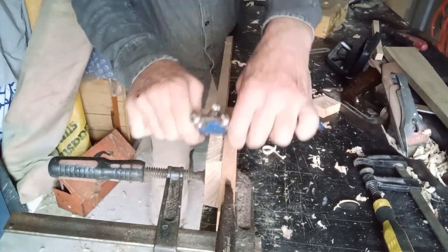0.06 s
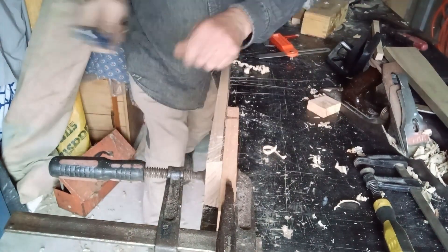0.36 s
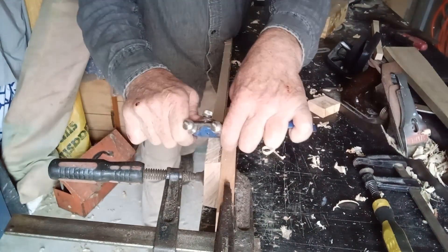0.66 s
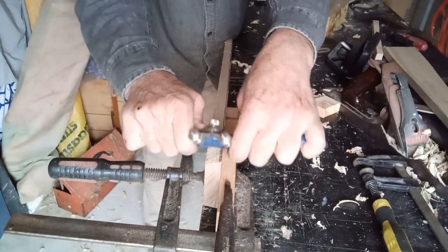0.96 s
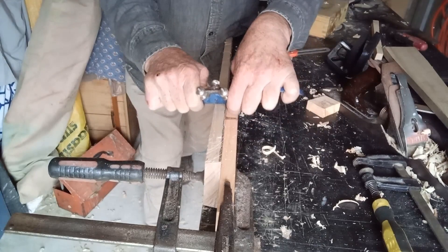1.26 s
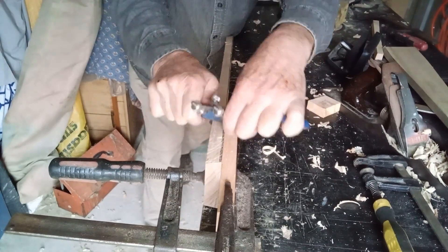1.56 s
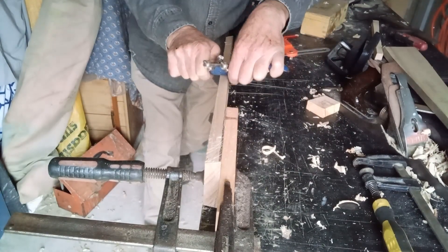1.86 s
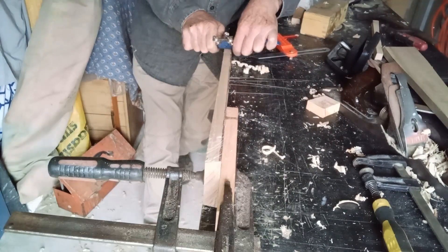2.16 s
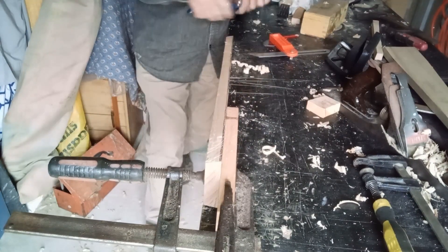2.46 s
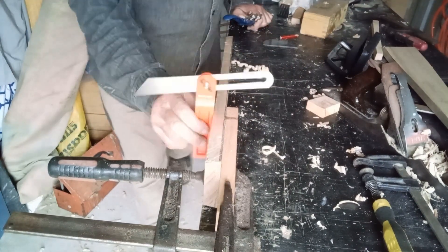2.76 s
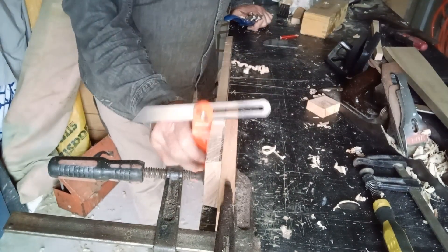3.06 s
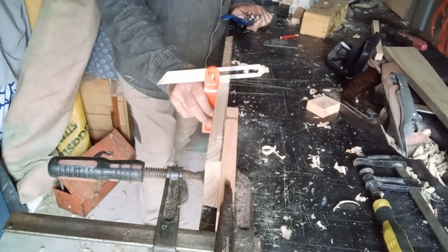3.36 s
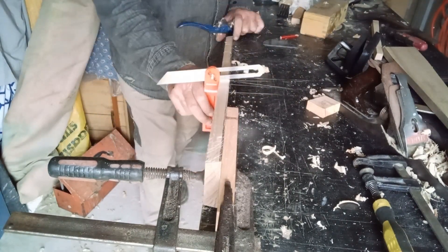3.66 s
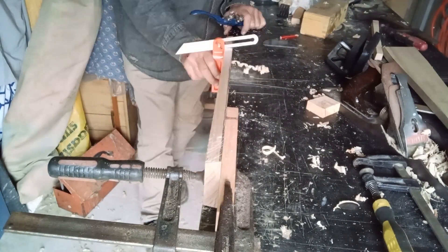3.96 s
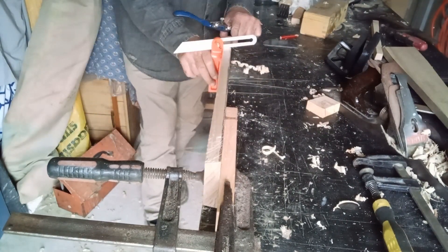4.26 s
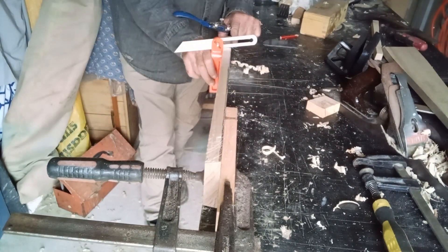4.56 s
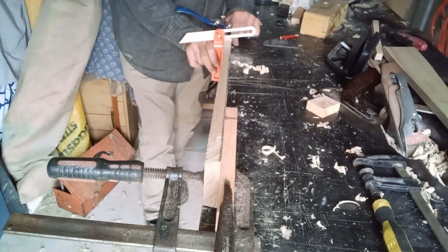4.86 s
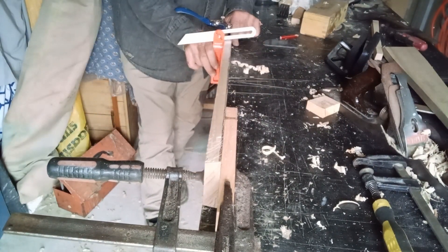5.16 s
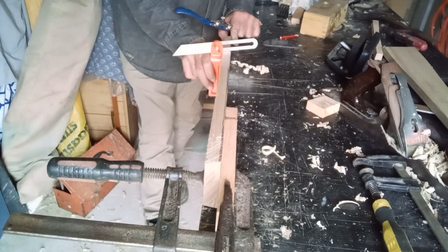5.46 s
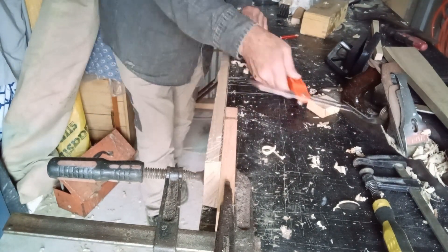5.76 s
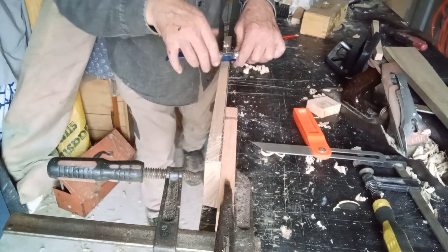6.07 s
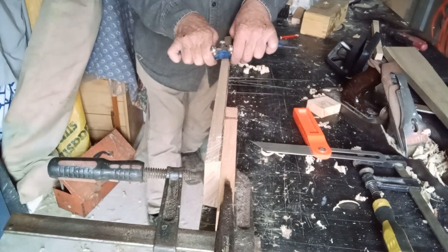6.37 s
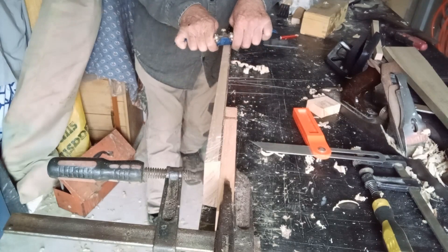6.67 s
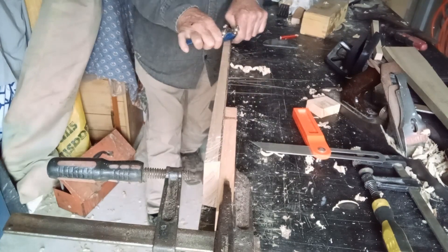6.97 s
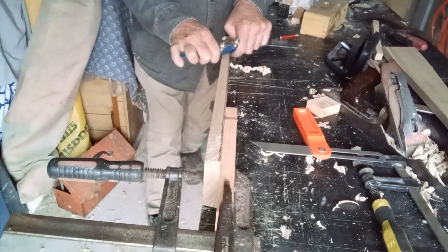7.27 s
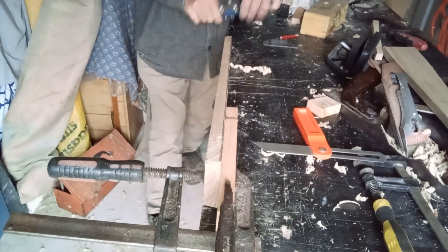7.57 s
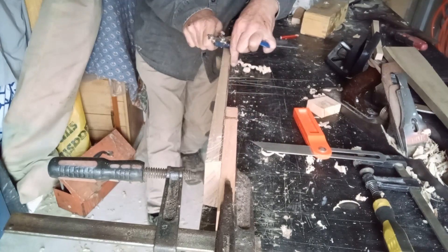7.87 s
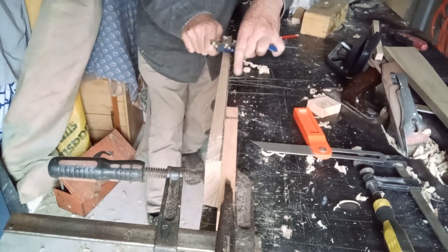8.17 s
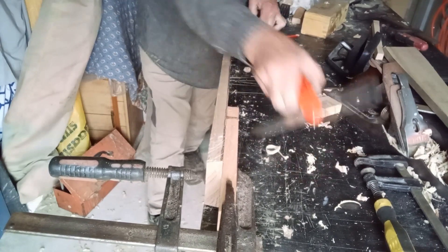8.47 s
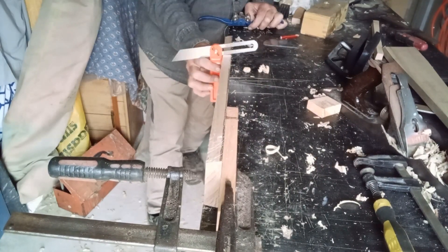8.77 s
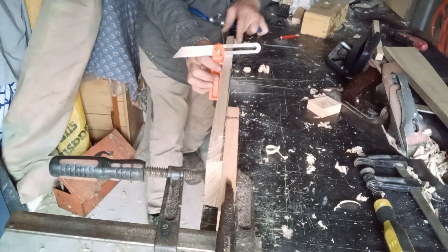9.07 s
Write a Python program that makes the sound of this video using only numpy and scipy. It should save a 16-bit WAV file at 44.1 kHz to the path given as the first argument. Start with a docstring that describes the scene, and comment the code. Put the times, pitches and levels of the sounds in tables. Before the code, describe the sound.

In a small workshop, sleeves brush and a tool knocks on wood. A spokeshave cuts along a wooden rail in quick, crunchy strokes that catch and chatter. The cutting stops while an angle gauge taps, slides and squeaks on the wood, then drops onto the bench with a brief rattle. A second bout of scraping follows, ending in a few knocks. The sound is close, over a faint hum.

```python
"""Sleeves brush softly and a tool knocks on wood, over the air and faint hum of a small workshop.
Then a spokeshave (a two-handled blade) cuts a bevel along a clamped wooden rail in two bouts: fibres
snap in a crunch, the edge catches and chatters in the grain, and rail and tool ring along.
Between the bouts a bevel gauge (a tool for checking angles) taps, slides and squeaks on the rail,
then is dropped on the bench and rattles to rest. A few last knocks and brushes end the work."""
import sys
import numpy as np
from scipy import signal
from scipy.fft import rfft, irfft, next_fast_len
from scipy.io import wavfile
from scipy.ndimage import uniform_filter1d

SR = 44100
rng = np.random.default_rng(int(sys.argv[2]) if len(sys.argv) > 2 else 0)


def to_wav(sig):
    """Store sig (one row per channel, or 1-D mono) as 16-bit WAV at the path in sys.argv[1].

    Samples outside -1..1 are clipped; the rate is SR.
    """
    pcm = np.clip(np.atleast_2d(sig), -1, 1) * 32767
    pcm = np.round(pcm).astype(np.int16)
    wavfile.write(sys.argv[1], SR, pcm.T)  # frames by channels


N = 411453
TAPS = 8192  # samples in a filter or a single hit
HZ = np.fft.rfftfreq(TAPS, 1 / SR)
# where the bass, middle, bite and hiss ranges each start and end: (frequency [Hz])
BAND_EDGES = [0, 480, 700, 1500, 1950, 3500, 5000, SR]
# the four ranges fade into each other and always add up to one
BANDS = np.array([np.interp(HZ, BAND_EDGES, np.repeat(row, 2)) for row in np.eye(4)])

# Levels in the tables are relative: each source's function may shift them.
# tone of the room's air: (frequency [Hz], level [dB])
AIR_TONE = [(18, -73.5), (30, -44.5), (75, -35.5), (161, -17.5), (184, -12.5), (233, -14), (280, -14),
            (319, -12.5), (355, -17.5), (426, -17), (473, -20), (9220, -39), (10200, -42),
            (16000, -42.5)]
# how much the air differs between the ears: (frequency [Hz], width [ratio])
AIR_WIDTH = [(60, .5), (140, .1), (300, 0.23), (1400, 0.59), (3000, 0.93)]
# the hum's two tones: (pitch [Hz], level [dB])
HUM_TONES = [(193, -9.5), (319, -3)]
# the hum swells and fades: (time [s], level [dB])
HUM_LEVEL = [(0, -97), (2.3, -64), (2.7, -61.5), (4.9, -62), (5.5, -66.5), (6.4, -66), (8.5, -70),
             (9.3, -72.5)]
# how long the room rings: (frequency [Hz], time to fade by 60 dB [s])
ROOM_DECAY = [(200, 0.11), (1000, 0.27), (4000, .22), (15000, 0.12)]
# how alike left and right are: (frequency [Hz], likeness [0 to 1])
LIKENESS = [(40, .8), (130, 0.99), (600, 1), (1400, 0.95), (3000, 0.66), (7000, .55), (15000, .4)]
# which side is louder: (frequency [Hz], left minus right [dB])
BALANCE = [(200, -0.4), (1000, 0), (2500, -2), (8000, -1.5), (14000, -1)]
# sleeves brush the tools: (middle time [s], length [s], level [dB], crackle over swish [dB],
# rate of the cloth's ribs [Hz])
BRUSHES = [(0.034, 0.073, -64, 1, 2130), (0.099, 0.037, -63.5, 1, 2150), (0.224, 0.19, -72.5, -3, 2240),
           (0.294, 0.042, -68.5, 5, 2370), (0.443, 0.12, -75.5, 5.5, 2300), (0.679, 0.14, -62.5, -7, 2500),
           (6.263, 0.28, -64.5, -12, 2450), (8.856, 0.09, -64.5, -17, 2280), (8.99, 0.07, -61.5, -23, 2520),
           (9.207, 0.21, -63, -12, 2400)]
# tone of rubbing cloth: (frequency [Hz], level [dB])
SWISH_TONE = [(150, -9), (1000, 2.5), (3500, -12.5), (7300, -4.5), (9000, -24), (16000, -26.5)]
# the gauge's steel blade slides on wood: (middle time [s], length [s], level [dB])
SLIDES = [(2.681, 0.036, -46), (3.012, 0.026, -53), (3.2, 0.05, -53), (3.212, .005, -44),
          (3.344, 0.062, -52), (3.354, .005, -40), (3.768, 0.035, -68), (3.975, 0.05, -65),
          (4.317, .05, -61), (6.004, 0.033, -52), (6.119, .008, -23.5)]
# the gauge drags and squeaks: (time [s], length [s], level [dB], start pitch [Hz], end pitch [Hz])
SQUEAKS = [(2.88, 0.035, -51, 1116, 747), (2.998, 0.022, -39, 1696, 1560),
           (3.171, 0.055, -38.5, 1291, 1153), (3.205, 0.056, -50.5, 760, 717),
           (3.318, .046, -36, 1195, 954), (3.345, 0.041, -41.5, 796, 702), (3.95, 0.033, -38, 1165, 1070),
           (3.99, 0.052, -45, 1690, 1760), (4.205, 0.024, -56.5, 1354, 960), (4.368, 0.039, -57, 1195, 940),
           (4.901, 0.027, -32.5, 1760, 1730), (5.168, .04, -59, 639, 730), (5.212, 0.049, -63.5, 760, 674),
           (5.31, .037, -59, 778, 790), (5.41, 0.055, -72, 15400, 15400), (5.555, 0.032, -66, 10850, 10200),
           (5.685, 0.043, -59.5, 643, 805), (5.725, 0.045, -63, 740, 670), (6.14, 0.044, -51, 800, 590),
           (6.195, 0.097, -61, 732, 698)]
# the gauge taps and scuffs: (time [s], level [dB], swell [s], brightness [dB], ring [Hz])
GAUGE_TAPS = [(2.625, -62, 0.00061, 7.5, 3140), (2.865, -59.5, 0.0091, 9.5, 2700),
              (2.882, -36, 0.00073, -17, 700), (2.902, -44.5, 0.0014, -12, 1560),
              (3.002, -45, 0.0021, 10.5, 1630), (3.178, -42.5, 0.0026, -4, 1300),
              (3.192, -38, 0.0035, -2.5, 1120), (3.2105, -45, 0.00037, 1.5, 2150),
              (3.232, -50.5, 0.0018, -12, 1100), (3.345, -32.5, 0.0077, 6, 1080),
              (3.382, -30, 0.00092, -11, 740), (3.406, -46.5, 0.0023, -11, 1100),
              (3.423, -65, 0.0013, -13, 1100), (3.712, -63.5, 0.014, 14, 2890),
              (3.832, -48, 0.000079, 5.5, 5160), (3.963, -41, 0.012, 2.5, 1110),
              (3.992, -34, 0.0063, -2, 1830), (4.038, -46, 0.0014, 5, 1830),
              (4.198, -53.5, 0.00098, 7.5, 2300), (4.215, -56, 0.0023, -15, 2190),
              (4.325, -63.5, .011, 16.5, 2790), (4.369, -47, 0.00025, 5, 1240),
              (4.647, -57.5, 0.00043, 1.5, 2370), (4.683, -62.5, 0.0037, -5, 2050),
              (4.8925, -36, 0.0019, 1.5, 5200), (4.9055, -34, 0.00059, 2, 1760),
              (4.936, -54, 0.0017, -3, 1760), (5.305, -54, 0.0072, 11.5, 785),
              (5.381, -43, 0.00052, -13.5, 760), (5.813, -67, 0.0036, 21, 2800),
              (5.826, -43, 0.00049, -2, 3170), (5.8835, -46, 0.00053, 7.5, 2440),
              (5.891, -43, 0.00054, 12, 2800), (5.963, -66, 0.00034, 8.5, 3900),
              (6.003, -78, 0.006, 29.5, 3030), (6.065, -39.5, 0.00045, 8.5, 3490),
              (6.086, -41.5, 0.0044, 6, 3170), (6.1, -33, 0.001, 6.5, 1560), (6.111, -40.5, .001, 10, 2700),
              (6.1152, -33.5, 0.0002, 9.5, 7800), (6.127, -35.5, 0.0011, 5, 2300),
              (6.143, -40.5, 0.00097, -3, 1240), (6.188, -54.5, .001, -10, 2200),
              (6.215, -69, 0.0024, 0, 2200), (6.24, -62.5, 0.0036, 5, 3200), (8.543, -47, 0.0059, -8, 1104),
              (8.558, -42, 0.00071, 4.5, 1586), (8.95, -54.5, 0.00039, 8.5, 3240),
              (9.145, -62.5, 0.0028, 9, 3570)]
# the gauge rattles on the bench: (time [s], first bounce level [dB], brightness [dB], ring [Hz])
RATTLES = [(5.92, -52.5, 2, 2160), (6.159, -51, -1.5, 1490)]
# overall tone of a gauge tap: (frequency [Hz], level [dB])
GAUGE_TONE = [(40, -61.5), (100, -41.5), (150, -68), (200, -46), (400, -15), (600, -16.5), (1100, 1.5),
              (2200, -4.5), (3200, -5), (5000, -8.5), (7500, -16.5), (11000, -22.5), (15500, -31.5)]
# where the gauge's plastic and steel ring: (frequency [Hz], width [Hz], boost [dB])
GAUGE_RINGS = [(760, 140, 12.5), (877, 28, -17.5), (1040, 94, 5), (1240, 99, 7), (1370, 120, 0),
               (1560, 51, 3), (2300, 160, 7), (2820, 200, 4.5), (3170, 160, 4.5), (4440, 110, 3),
               (6970, 300, 5), (10600, 400, 4)]
# where the clamped rail rings or sounds hollow: (frequency [Hz], width [Hz], boost [dB])
RAIL_RINGS = [(222, 22, 13), (379.8, 10, 3.5), (470, 110, 8), (622, 84, -14), (760, 133, 12.5),
              (885, 47, -16), (1080, 110, 0.5), (1240, 51, 5.5), (1400, 76, -10), (1430, 35, 3.5),
              (1760, 340, -1), (2180, 130, 5.5), (2740, 120, -7), (2780, 190, 7), (3202, 46, 6.5),
              (3800, 340, -1), (3980, 64, 6), (4330, 96, 2), (5700, 1200, -1.5), (7000, 450, 3),
              (10200, 1600, 4.5)]
# where the spokeshave's iron body rings: (frequency [Hz], width [Hz], boost [dB])
IRON_RINGS = [(1490, 150, 3), (1760, 140, -4.5), (2650, 230, 2.5), (4560, 120, 2), (12500, 76, 7)]
# the spokeshave knocks on wood: (time [s], level [dB], thud [dB], brightness [dB], ring [Hz])
KNOCKS = [(0.331, -52.5, -5, -17, 1120), (0.606, -31, -9, -1.5, 3090), (0.696, -59, 12.5, -11, 470),
          (2.537, -52.5, 9, 2.5, 1320), (2.664, -33, -7.5, 7.5, 2480), (7.3121, -25, -4, 7, 4500),
          (7.3406, -29, 0, 8.5, 1090), (7.747, -33, 1.5, -7.5, 794), (7.779, -55.5, -6, 9, 1210),
          (8.273, -28.5, 3, 2.5, 1320), (8.695, -31.5, -1, -11, 1400), (8.739, -36.5, -12.5, -7, 810),
          (8.769, -46, -11, 2.5, 1430), (8.834, -51.5, -7, -25, 805)]
# overall tone of a knock: (frequency [Hz], level [dB])
KNOCK_TONE = [(40, -40.5), (100, -35.5), (150, -32.5), (200, -29.5), (400, -5), (600, -11.5), (1100, -0.5),
              (2200, -9), (3200, -8), (5000, -15.5), (7500, -25.5), (11000, -37.5), (15500, -47)]
# the blade catches in the grain: (time [s], level [dB], swell [s], fade [s], thud [dB],
# brightness [dB], ring [Hz])
CATCHES = [(0.784, -45, 0.0029, 0.011, 4, -14, 466), (0.83, -37.5, 0.007, 0.013, 6, -8.5, 760),
           (0.865, -42.5, 0.0045, 0.0043, 4.5, -10, 474), (0.903, -42, 0.0024, 0.0061, -5, -13, 513),
           (0.969, -44.5, 0.0032, 0.008, 1, 4, 1830), (1.066, -48.5, 0.0056, .006, -10, 4, 3400),
           (1.114, -38.5, 0.00061, 0.0076, 7.5, 9.5, 818), (1.167, -42, 0.0035, 0.042, 5.5, -2, 1100),
           (1.465, -32, 0.0036, 0.0057, 2.5, 12.5, 414), (1.489, -32.5, 0.0051, 0.014, 6, 10, 238),
           (1.565, -42, 0.0013, .006, -9, -13, 1110), (1.578, -35, 0.0026, 0.012, -11.5, -6.5, 1080),
           (1.765, -56, 0.0026, 0.016, 9, 17.5, 2300), (2.102, -54.5, 0.0023, 0.01, -5, 14, 2900),
           (2.153, -36.5, 0.0023, 0.027, 10.5, -6, 229), (2.355, -41, 0.0065, 0.0079, -13, -4, 810),
           (2.47, -48, .011, 0.0052, 14, 18.5, 399), (6.77, -41.5, 0.0042, 0.0049, -5.5, 4.5, 2280),
           (6.818, -23.5, .004, 0.0061, 6, 6, 367), (6.828, -23.5, 0.0033, .0074, -10, 8, 380),
           (6.926, -31, 0.0058, 0.011, -13.5, 4, 1000), (6.947, -39.5, .003, .006, -8.5, 5.5, 1320),
           (7.108, -43.5, 0.0046, 0.012, 4.5, 0.5, 2170), (7.218, -26, 0.002, 0.0067, 5.5, 9, 1428),
           (7.604, -21, 0.0064, 0.0066, 7, 8, 1333), (8.18, -32.5, 0.0023, 0.0055, 8.5, 9.5, 1400),
           (8.199, -35, 0.0007, 0.005, 4.5, 8, 1610), (8.33, -56.5, 0.0047, .008, 3, 20.5, 2200)]
# overall tone of a catch: (frequency [Hz], level [dB])
CATCH_TONE = [(40, -33.5), (100, -39), (150, -22.5), (200, -17), (340, -3.5), (500, -7), (700, -4),
              (1100, -1.5), (1550, -2), (2200, -6), (3200, -10), (5000, -18.5), (7500, -27), (11000, -36),
              (15500, -39)]
# the edge makes blade or rail sing: (time [s], length [s], level [dB], start pitch [Hz], end pitch [Hz])
CHATTERS = [(.902, 0.033, -36.5, 503, 470), (.925, 0.017, -40, 1790, 1900), (.958, .019, -35, 1885, 1860),
            (.97, 0.02, -44, 440, 514), (1.016, 0.028, -43.5, 1237, 1260), (1.152, 0.035, -44.5, 470, 454),
            (1.435, 0.052, -32.5, 434, 400), (1.805, 0.047, -47, 340, 427), (1.88, 0.026, -47, 1240, 1300),
            (1.94, 0.032, -44, 1200, 1320), (1.945, 0.052, -46.5, 2960, 2800),
            (2.065, 0.031, -46.5, 1240, 1370), (2.14, 0.12, -45, 235.3, 228), (2.255, 0.032, -49, 384, 229),
            (2.265, 0.13, -47, 2380, 2166), (2.345, 0.076, -49.5, 232, 221), (2.46, 0.041, -45.5, 505, 985),
            (6.565, 0.084, -49.5, 270, 214), (6.665, 0.034, -39.5, 2360, 2220),
            (6.808, 0.05, -25.5, 377, 370), (7.025, 0.054, -47.5, 2250, 2300),
            (7.045, 0.062, -50, 239, 225), (7.43, 0.039, -44, 2300, 2110), (7.46, 0.063, -42.5, 2230, 2190),
            (7.46, 0.076, -43, 330, 307), (7.54, 0.03, -41.5, 470, 398), (7.588, 0.041, -34, 394, 372),
            (7.905, .07, -66, 15000, 15100), (7.925, 0.056, -49, 407, 335), (8.018, 0.058, -46, 339, 478),
            (8.08, 0.05, -50, 2235, 2150), (8.1, 0.038, -47, 420, 442)]
# cutting strokes; the tool's ring changes with the grip, the rail's boom with distance from the clamp:
# (start [s], end [s], force [dB], rise in force [dB], bass from depth of cut [dB], edge bite [dB],
# shaving hiss [dB], ring [Hz], ring strength [ratio], boom [Hz], boom strength [ratio])
STROKES = [(0.898, 0.992, -40.5, 2.5, -10, -1.5, -5.5, 1860, 1, 477, 2.5),
           (1.035, 1.095, -49, 1, -9, 1.5, 2, 1814, .7, 482, 1.1),
           (1.213, 1.264, -43, 3.5, -10.5, 2, -4, 1857, 1.2, 472, 2.3),
           (1.286, 1.433, -39, -1, -12, 4, -2.5, 1930, 1.4, 465, 2.3),
           (1.453, 1.51, -34.5, 2, -5, 4, -3.5, 1970, 1.2, 412, 1.1),
           (1.591, 1.64, -56, 4, -15, -3.5, 1.5, 1905, .5, 419, 1.4),
           (1.684, 1.921, -51, 4.5, -2, 5, 3.5, 2880, .9, 394, 0.96),
           (1.939, 2.193, -45, 5, -8.5, 1, 1, 2860, 1.1, 333, 1.6),
           (2.228, 2.412, -49.5, 2, -3, 2, 7, 2190, 1.7, 224.4, 2.1),
           (2.432, 2.486, -39.5, 1.5, -3.5, -5, -3.5, 2160, 1.2, 300, 1.6),
           (6.55, 6.605, -49, 3.5, 5, 6.5, 6.5, 2240, 1.3, 246, 1.1),
           (6.637, 6.86, -43, 0, -4, 1.5, 2, 2266, 1.8, 344, 0.99),
           (6.976, 7.073, -48.5, 11, 3, -1, 7, 2230, 1.1, 397, 1),
           (7.166, 7.238, -47.5, 3, 6.5, 0.5, -5.5, 2240, 1.2, 225, 1.8),
           (7.393, 7.508, -46, 14, 5.5, 3.5, 9.5, 2250, 1.7, 229.6, 2.1),
           (7.542, 7.555, -43.5, -1.5, 1.5, 1, -3, 2220, 1.4, 233.4, 1),
           (7.63, 7.713, -64, -15.5, 6, 1, -11, 2233, 1.4, 230, 1.9),
           (7.888, 8.21, -47.5, 1.5, -4.5, 0, 4.5, 2147, 1.1, 397, 0.87),
           (8.277, 8.396, -51.5, -1.5, 6, 1, 8, 2120, 1.4, 306, 0.92)]
# overall tone of the cut: (frequency [Hz], level [dB])
CUT_TONE = [(40, -29), (100, -26.5), (150, -32.5), (200, -7.5), (400, -0.5), (600, -6), (1100, -2.5),
            (2200, -8.5), (3200, -13), (4300, -19), (7500, -24.5), (11000, -30.5), (15500, -37.5)]


def gain_of(db):
    """Turns decibels into a number to multiply by."""
    return 10 ** (np.asarray(db) / 20)


def evened(x):
    """Scales a signal to an average power of one."""
    return x / np.sqrt(np.mean(x ** 2) + 1e-20)


def read(points, hz):
    """Looks up a table at any frequency, giving each octave about equal room."""
    f, value = np.transpose(points)
    return np.interp(np.log(hz + 1), np.log(f + 1), value)


def follow(rows):
    """Joins timed rows into one curve for each column."""
    times, *columns = np.transpose(rows)
    return [np.interp(np.arange(N) / SR, times, column) for column in columns]


def add(mix, s, sound):
    """Mixes a sound in at s seconds."""
    part = mix[max(round(s * SR), 0):][:len(sound)]
    part += sound[:len(part)]


def wander(rate_hz, step=64):
    """A smooth random wobble with a typical size of one."""
    size = N // step + 2
    f = np.fft.rfftfreq(size, step / SR)
    slow = evened(irfft(rfft(rng.standard_normal(size)) / (1 + (f / rate_hz) ** 4), size))
    return np.interp(np.arange(N) / step, np.arange(size), slow)


def bumps(rings):
    """The peaks and dips, in dB, that an object's ringing puts in its tone."""
    return sum(db / (1 + (2 * (HZ - hz) / width) ** 2) for hz, width, db in rings)


def ripple(depth_db, from_hz, size=28):
    """The many tiny resonances of metal parts, as random peaks and dips in dB."""
    peaks = evened(uniform_filter1d(uniform_filter1d(rng.standard_normal(len(HZ)), size), size))
    softened = np.where(peaks > 0, 2 * np.tanh(peaks / 2), peaks)
    return depth_db * softened * HZ ** 2 / (HZ ** 2 + from_hz ** 2)


def ringing_filter(db):
    """A filter with this tone that rings only after a blow, never before."""
    log_gain = np.log(gain_of(np.r_[db, db[-2:0:-1]]))
    return np.exp(np.conj(signal.hilbert(log_gain)))[:len(db)]


def resonate(x, hz, width_hz):
    """Makes x ring at a moving pitch; a narrower width rings longer."""
    turn = np.exp(2j * np.pi * np.cumsum(hz) / SR)
    decay = np.exp(-np.pi * width_hz / SR)
    return 2 * (turn * signal.lfilter([1 - decay], [1, -decay], x / turn + 1e-18)).real


def room_air(level_db=-66.5):
    """A soft, steady rush, alike in both ears only in the bass."""
    size = next_fast_len(N)
    f = np.fft.rfftfreq(size, 1 / SR)
    mid, side = rfft(rng.standard_normal((2, size))) * gain_of(read(AIR_TONE, f))
    side = side * read(AIR_WIDTH, f)
    air = irfft(np.array([mid + side, mid - side]), size)[:, :N]
    return evened(air) * gain_of(level_db + 0.2 * wander(4.3))


def hum(drift=.004):
    """Two faint low tones that waver in level and pitch."""
    tones = np.zeros(N)
    for hz, db in HUM_TONES:
        level = gain_of(db + wander(2.6))
        pitch = hz * (1 + drift * wander(5.75))
        tones += level * np.sin(2 * np.pi * np.cumsum(pitch) / SR)
    return np.sqrt(2) * tones * gain_of(follow(HUM_LEVEL)[0])


def workshop_echo(x, early_db=-22, late_db=-29):
    """Sound bounces off bench and walls: a few quick echoes, then a short dull tail."""
    size = SR // 2
    bounces = rng.choice([-1., 1.], (2, size)) * (rng.random((2, size)) < 3000 / SR)
    bounces[:, :round(.012 * SR)] = 0
    hz, t, spectrum = signal.stft(bounces, SR, nperseg=256)
    fade = gain_of(-60 * t / read(ROOM_DECAY, hz)[:, None])
    tail = signal.istft(spectrum * fade, SR, nperseg=256)[1]
    early = np.zeros_like(tail)
    early[:, (rng.uniform(.003, .018, 8) * SR).astype(int)] = rng.choice([-1., 1.], 8) / np.sqrt(8)
    echo = gain_of(early_db) * early + gain_of(late_db) * tail / np.linalg.norm(tail[0])
    return signal.fftconvolve(x[None], echo, axes=1)[:, :N]


def stereo(direct, scattered, lag_s=3.4e-5):
    """The left side hears a little later, and the treble scatters differently to each side."""
    size = next_fast_len(N + TAPS)
    f = np.fft.rfftfreq(size, 1 / SR)
    same = np.clip(read(LIKENESS, f), 0, 1)
    mid = rfft(direct, size)
    side = np.sqrt((1 - same) / (1 + same)) * rfft(scattered, size)
    side -= 1j * np.tan(np.minimum(np.pi * f * lag_s, .62)) * mid  # delays the left
    lean = gain_of(read(BALANCE, f) / 2)
    return irfft(np.array([(mid + side) * lean, (mid - side) / lean]), size)[:, :N]


def sleeves(grain_db=4, crackle_hz=2500, whistle=0.66, width_hz=600, slowing=.11):
    """Cloth slides over the tools: a swish, dry crackle and a rib whistle that sinks as it slows."""
    out = np.zeros(N)
    for s, length, db, crackle_db, rib_hz in BRUSHES:
        size = round(length * SR) + 2
        f = np.fft.rfftfreq(size, 1 / SR)
        rub, grains, sizes = rng.standard_normal((3, size))
        hz = rib_hz * (1 + slowing * np.linspace(.5, -.5, size) + .022 * wander(20)[:size])
        ribs = sum(resonate(resonate(rub, k * hz, width_hz), k * hz, width_hz) / k for k in (2, 3))
        swish = evened(irfft(rfft(rub) * gain_of(read(SWISH_TONE, f)), size))
        swish = evened(swish + whistle * evened(ribs))
        grains = grains * gain_of(grain_db * sizes)
        crackle = evened(irfft(rfft(grains) * f / (f + crackle_hz) ** 1.8, size))
        cloth = swish + gain_of(crackle_db) * crackle
        add(out, s - length / 2, gain_of(db) * cloth * signal.windows.tukey(size, .7))
    return out


def gauge_slides(band_hz=(7500, 14000), grain_db=3, judder_db=2.5):
    """Thin steel sliding on end grain gives a fine, very high sizzle."""
    grains = rng.standard_normal(N) * gain_of(grain_db * rng.standard_normal(N))
    treble_only = signal.butter(2, band_hz, "band", fs=SR)
    judder = gain_of(judder_db * np.clip(wander(150), -2, 1.5))
    sizzle = evened(signal.lfilter(*treble_only, grains)) * judder
    pressure = np.zeros(N)
    for s, length, db in SLIDES:
        add(pressure, s - length / 2, gain_of(db) * signal.windows.tukey(round(length * SR) + 2, .7))
    return sizzle * pressure


def stick_slip(rows, level_db, jitter, jitter_hz, flutter_db, taper, lowest_hz=186):
    """An edge sticks and slips in step with a resonance: a rough tone that glides as the edge moves."""
    out = np.zeros(N)
    waver = 1 + jitter * wander(jitter_hz)
    flutter = gain_of(flutter_db * wander(jitter_hz))
    for s, length, db, start_hz, end_hz in rows:
        size = round(length * SR) + 2
        at = round(s * SR) + np.arange(size)
        turns = np.cumsum(np.geomspace(start_hz, end_hz, size) * waver[at]) / SR
        tone = np.sin(2 * np.pi * turns) * flutter[at] * signal.windows.tukey(size, taper)
        add(out, s, gain_of(db + level_db) * evened(tone))
    return signal.sosfilt(signal.butter(6, lowest_hz, "high", fs=SR, output="sos"), out)


def hits(rows, tone, rings, level_db, bite_db, bite_share, ring_db, ring_sharpness, crack,
         grain_db, tail_db, tail_s):
    """Each hit is a burst of tiny impacts that swells, cracks and dies away in the struck object."""
    out, t = np.zeros(N), np.arange(TAPS) / SR
    body_db = read(tone, HZ) + bumps(rings)
    for s, db, swell, fade, thud_db, bright_db, ring_hz in rows:
        lead = 4 * swell
        rising = np.exp(np.minimum(t - lead, 0) / swell)
        after = np.maximum(t - lead, 0)
        tail = gain_of(tail_db) * np.exp(-after / tail_s)
        dying = (1 + after / fade) * np.exp(-1.5 * after / fade) + tail
        noise, sizes = rng.standard_normal((2, TAPS))
        burst = rising * dying * noise * gain_of(grain_db * sizes)
        blow = rfft(burst / np.linalg.norm(burst) + crack * (np.arange(TAPS) == round(lead * SR)))
        # even out the four ranges, then give them this hit's thud and brightness
        chance_db = 10 * np.log10(BANDS @ abs(blow) ** 2 / BANDS.sum(axis=1))
        wanted_db = np.array([thud_db, 0, bite_db + bite_share * bright_db, bright_db])
        tone_db = body_db + (wanted_db - chance_db) @ BANDS
        # the struck spot favours one pitch, less so where the object already rings
        lift_db = ring_db - 0.14 * np.interp(ring_hz, HZ, bumps(rings))
        spot_db = bumps([(ring_hz, ring_hz / ring_sharpness, lift_db)])
        sound = blow * ringing_filter(tone_db + ripple(depth_db=3.5, from_hz=1700) + spot_db)
        # the middle range, as if spread over 20 ms, sets the level
        middle = np.linalg.norm(irfft(sound * BANDS[1])) / np.sqrt(.02 * SR)
        add(out, s - lead, irfft(sound) * gain_of(db + level_db) / middle)
    return out


def gauge_taps(bounces=6, gap_s=0.018, loss_db=3.5, bounce_swell_s=0.0023, fade_s=0.0076):
    """The gauge taps the wood and bounces on the bench, each bounce weaker than the last."""
    touches = list(GAUGE_TAPS)
    for s, db, bright_db, ring_hz in RATTLES:
        for k in range(bounces):
            bounce_hz = ring_hz * np.exp(0.22 * rng.standard_normal())
            touches.append((s + k * gap_s, db - loss_db * k, bounce_swell_s, bright_db, bounce_hz))
    # slow touches linger; bright ones have less thud
    rows = [(s, db, swell, fade_s + swell, 2.5 - 0.46 * bright_db, bright_db, ring_hz)
            for s, db, swell, bright_db, ring_hz in touches]
    return hits(rows, GAUGE_TONE, GAUGE_RINGS, level_db=-2, bite_db=2, bite_share=0.38, ring_db=9.5,
                ring_sharpness=6, crack=0.17, grain_db=2.5, tail_db=-35, tail_s=.02)


def jolted_rings(damping=1.13, rail_share=0.92):
    """A jolt rings both the tool's iron and the rail, which the pressed tool damps."""
    return [(hz, width * damping, db * rail_share) for hz, width, db in RAIL_RINGS] + IRON_RINGS


def spokeshave_knocks(swell_s=0.00033, fade_s=0.0061):
    """The spokeshave is set down on the rail; every knock is equally short."""
    rows = [(s, db, swell_s, fade_s, *colour) for s, db, *colour in KNOCKS]
    return hits(rows, KNOCK_TONE, jolted_rings(), level_db=0, bite_db=-1.5, bite_share=0.17,
                ring_db=7.5, ring_sharpness=7.2, crack=0.088, grain_db=5, tail_db=-32.5, tail_s=0.014)


def blade_catches():
    """The blade catches and skips in the grain, jolting tool and rail."""
    return hits(CATCHES, CATCH_TONE, jolted_rings(), level_db=-.5, bite_db=-1, bite_share=0.51,
                ring_db=9.5, ring_sharpness=5, crack=0.076, grain_db=3.5, tail_db=-30, tail_s=0.026)


def stroke_curves(attack_s=0.017, release_s=0.026, ring_sink=.01, boom_sink=0.039, uneven_hz=14):
    """Force and tone over time: each stroke bites in, sinks a little in pitch and lifts off."""
    t, force, colour = np.arange(N) / SR, np.zeros(N), []
    for start, end, db, rise_db, depth_db, bite_db, hiss_db, ring_hz, ring, boom_hz, boom in STROKES:
        travel = np.interp(t, [start, end], [-1, 1])
        arch_db = .5 - travel ** 2  # the arms add pressure in mid-stroke
        lifted = np.maximum(start - t, 0) / attack_s + np.maximum(t - end, 0) / release_s
        force += gain_of(db + travel * rise_db / 2 + arch_db - 20 * np.minimum(lifted, 10))
        for s, along in (start, -1), (end, 1):
            push_db = along * rise_db / 2  # bite and hiss follow only part of this push
            colour.append((s, depth_db, bite_db - 0.72 * push_db, hiss_db - 0.53 * push_db,
                           ring_hz * (1 - ring_sink * along), ring,
                           boom_hz * (1 - boom_sink * along), boom))
    depth_db, bite_db, hiss_db, *ringing = follow(colour)
    # the grain of the wood makes the cut uneven, and the hiss comes and goes
    spreads = (20 * np.log10(force), 2.1), (depth_db, 2), (bite_db, 2), (hiss_db, 3)
    return [db + spread_db * wander(uneven_hz) for db, spread_db in spreads] + ringing


def travelling(x, count=4, shift_db=5, shift_hz=6):
    """As the blade travels, the tiny resonances of one spot give way to those of the next."""
    spots = [irfft(ringing_filter(ripple(depth_db=5, from_hz=3000, size=48))) for _ in range(count)]
    sounds = np.array([signal.oaconvolve(x, spot)[:N] for spot in spots])
    shares = np.array([gain_of(shift_db * wander(shift_hz)) ** 2 for _ in range(count)])
    return (sounds * shares).sum(axis=0) / shares.sum(axis=0)


def spokeshave_cuts(snaps_per_s=4200, slips_per_s=60, judder_db=2.5, judder_hz=70, rasp_hz=7100):
    """Fibres snap under a juddering edge; rail, tool and shaving ring with them."""
    force_db, depth_db, bite_db, hiss_db, ring_hz, ring, boom_hz, boom = stroke_curves()
    sizes = gain_of(1.1 * np.minimum(rng.exponential(1, N), 5)) * rng.choice([-1, 1], N)
    snaps = evened(sizes * (rng.random(N) < snaps_per_s / SR))
    slips = evened(rng.choice([-1., 1.], N) * (rng.random(N) < slips_per_s / SR))  # the edge jumps
    rub = rng.standard_normal(N)
    crunch = (snaps + 0.17 * slips + 0.5 * rub) * gain_of(judder_db * wander(judder_hz))
    tool = ring * resonate(crunch, ring_hz * (1 + 0.02 * wander(21)), width_hz=130)
    rail = boom * resonate(crunch, boom_hz * np.exp(0.11 * wander(13)), width_hz=65)
    # the shaving's two pitches glide as it curls and breaks
    shaving = sum(resonate(crunch, hz * np.exp(.14 * wander(20)), width_hz=90) for hz in (1250, 2600))
    cut = crunch + tool + rail + 1.5 * shaving
    # it leaves the tool with a smoother hiss, and the blade adds a thin rasp that comes and goes
    hiss = 0.65 * cut + 0.9 * rng.standard_normal(N)
    rasp_level = .55 * gain_of(4 * wander(8))
    rasp = resonate(hiss, rasp_hz * np.exp(0.034 * wander(9)), width_hz=500)
    hiss = travelling(hiss + rasp)
    # give it the rail's tone and split it into four ranges, each with its own level
    body = ringing_filter(read(CUT_TONE, HZ) + bumps(RAIL_RINGS) + ripple(depth_db=1, from_hz=6400))
    filters = np.fft.fftshift(irfft(body * BANDS), axes=1)
    parts = signal.oaconvolve(np.array([cut, cut, cut, hiss]), filters, axes=1)[:, TAPS // 2:][:, :N]
    ranges = zip(parts, (depth_db, 0, bite_db, hiss_db - .5))
    return sum(part * gain_of(force_db + extra_db) for part, extra_db in ranges) / np.std(parts[1])


def handwork():
    """Everything the hands do, with fresh random detail on each call."""
    work = spokeshave_cuts() + sleeves() + gauge_slides()
    work += stick_slip(CHATTERS, level_db=0.5, jitter=.03, jitter_hz=159.5, flutter_db=4.5, taper=0.84)
    work += stick_slip(SQUEAKS, level_db=-2.5, jitter=.028, jitter_hz=250, flutter_db=5.5, taper=0.93)
    return work + blade_catches() + spokeshave_knocks() + gauge_taps()


def scene():
    """The handwork in stereo, with the workshop's echo, air and hum."""
    work = handwork()
    return stereo(work, scattered=handwork()) + workshop_echo(work) + room_air() + hum()


def record(dry):
    """Cuts off the very highest treble, above 16100 Hz."""
    low_pass = signal.firwin(511, 16100, window=("kaiser", 9), fs=SR)
    return signal.oaconvolve(dry, low_pass[None], "same")


dry = scene()
out = record(dry)
to_wav(out)
```